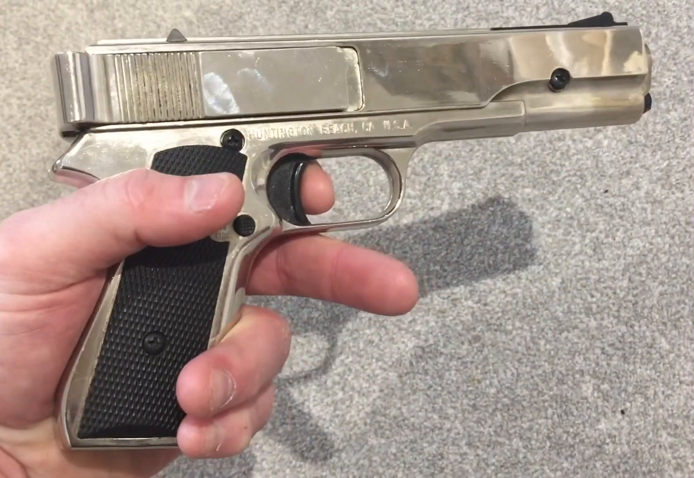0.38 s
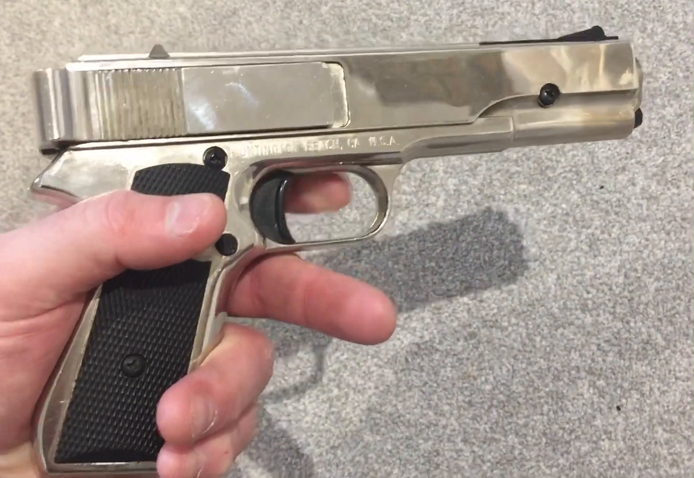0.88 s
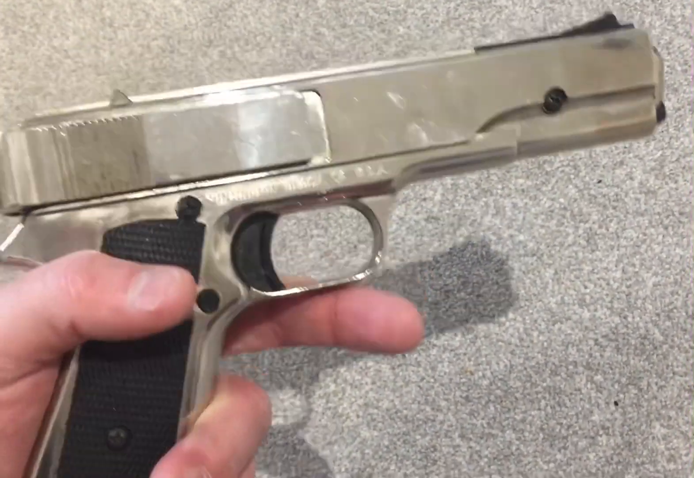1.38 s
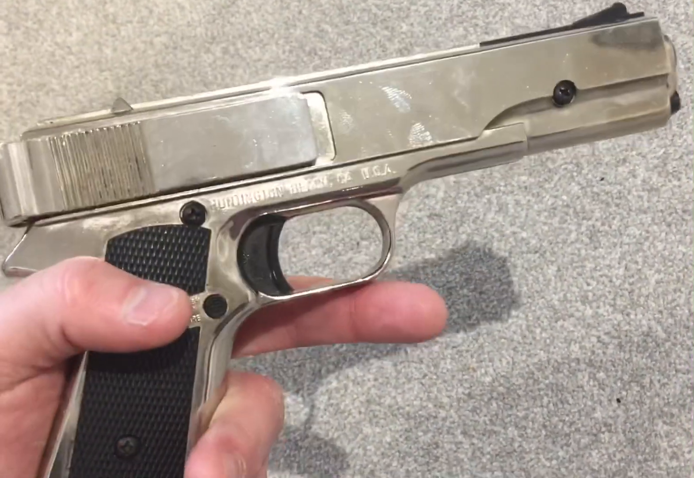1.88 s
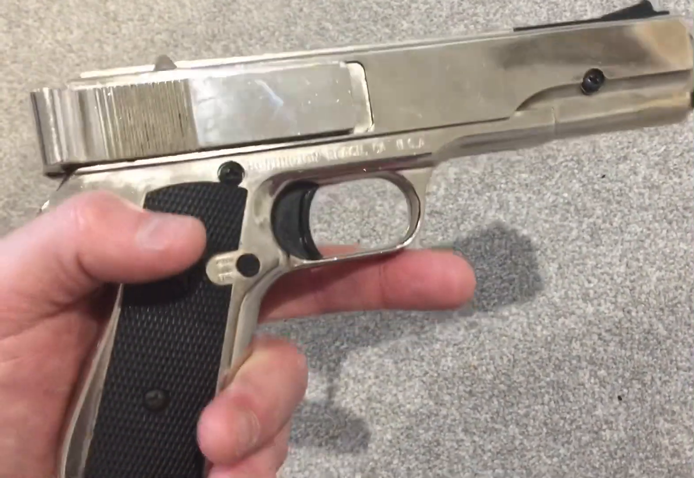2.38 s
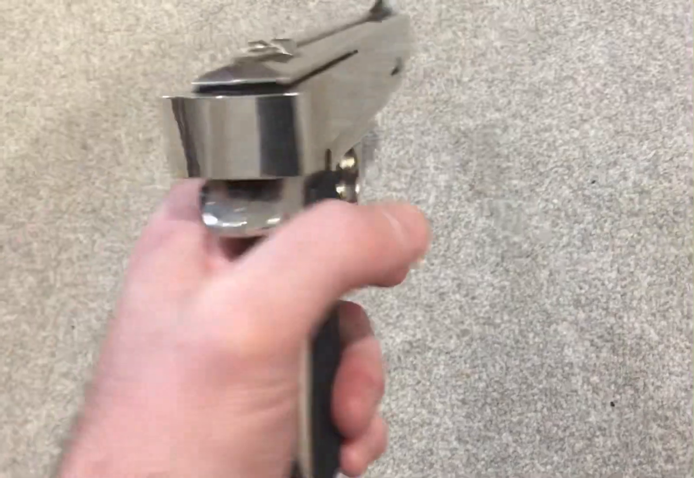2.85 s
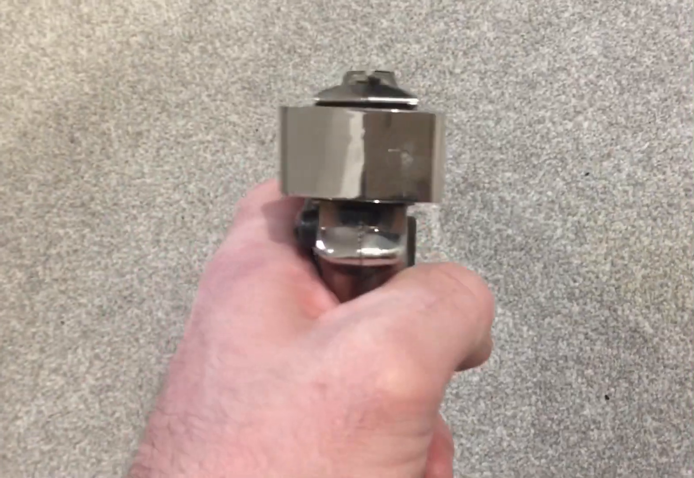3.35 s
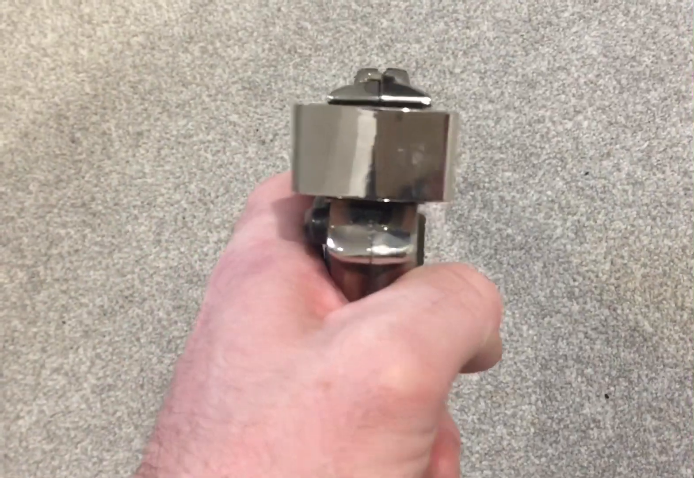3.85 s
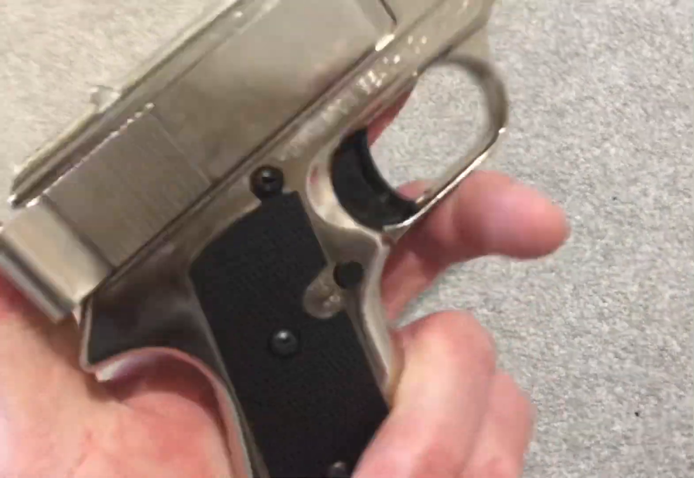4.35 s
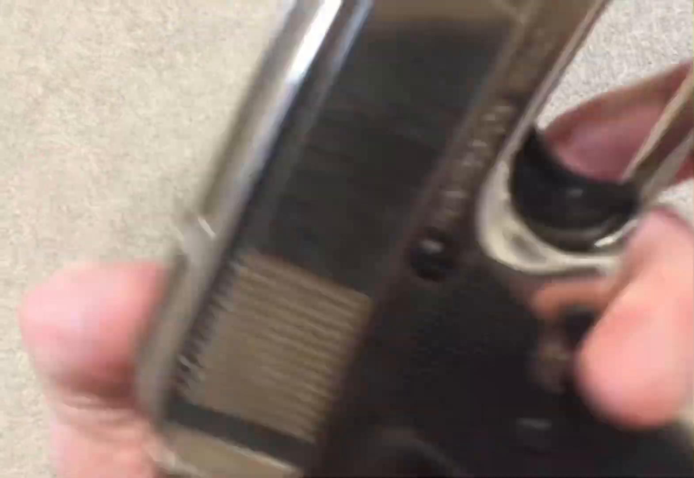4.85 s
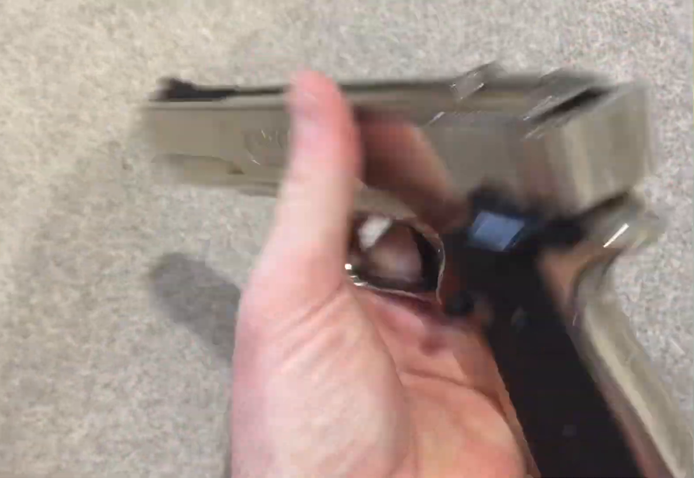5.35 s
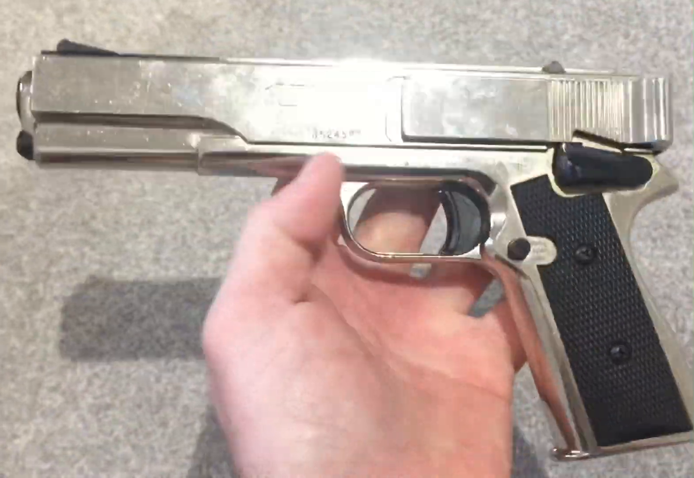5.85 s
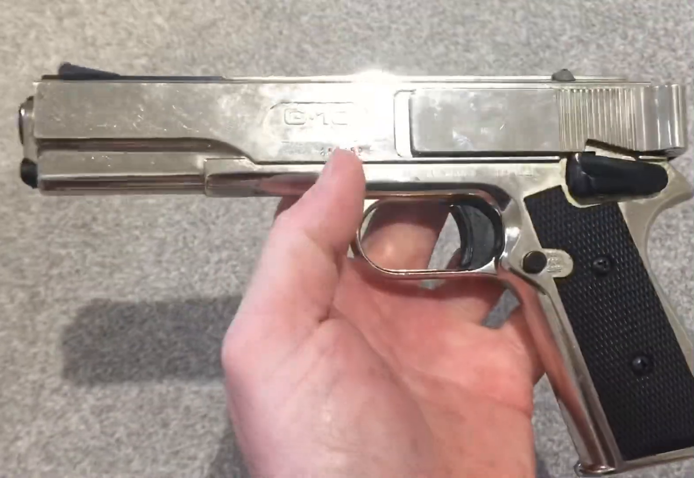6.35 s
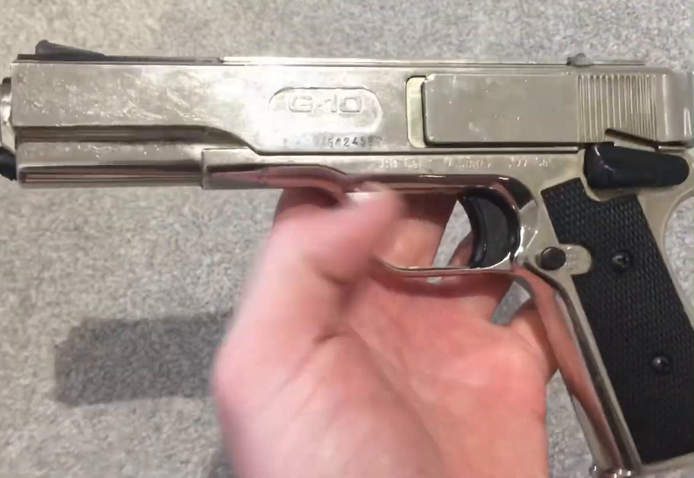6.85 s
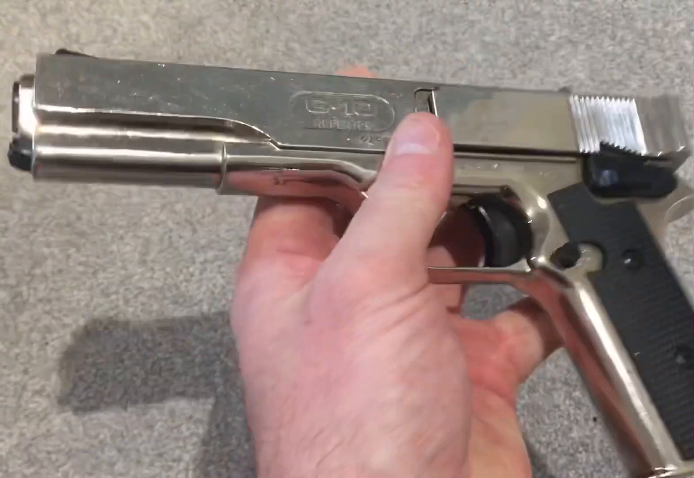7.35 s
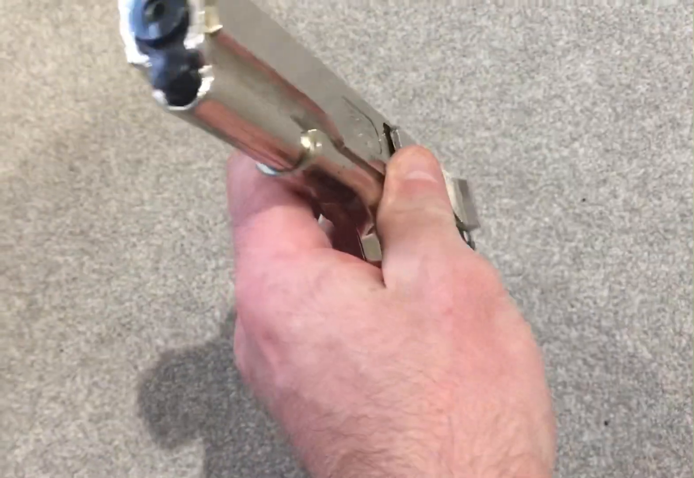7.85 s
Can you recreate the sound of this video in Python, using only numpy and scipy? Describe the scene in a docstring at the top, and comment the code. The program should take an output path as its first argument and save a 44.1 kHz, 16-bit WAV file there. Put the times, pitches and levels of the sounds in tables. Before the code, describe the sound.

Mostly quiet room hiss, then a busy cluster of sharp, dry metallic clacks and rattling as a metal air pistol changes hands.

```python
"""A quiet carpeted room, where a metal air pistol is turned over in the hands close to a phone.
Loose parts knock inside the casting: bursts of micro-contacts excite its damped modes.
Sliding fingers and parts, and rattling tails after knocks, are dense slips in the same modes plus hiss.
Soft low bumps of the hand on the phone, faint reflections, air hiss, booming bands and thin
wavering tones complete the scene."""
import sys
import numpy as np
from scipy import signal
from scipy.fft import rfft, irfft
from scipy.io import wavfile
from scipy.ndimage import uniform_filter1d

SR = 44100
rng = np.random.default_rng(int(sys.argv[2]) if len(sys.argv) > 2 else 0)


def generate_wav(sig):
    """Save sig (samples, or channels by samples) to the path in sys.argv[1] as 16-bit PCM at SR."""
    pcm = np.round(np.clip(np.atleast_2d(sig).T, -1, 1) * 32767).astype(np.int16)
    wavfile.write(sys.argv[1], SR, pcm)


def to_linear_factor(level_db):
    """Convert decibel levels (scalar or array-like) to linear amplitude factors."""
    exponent = np.asarray(level_db, float) / 20
    return 10 ** exponent


N = 351477  # length in samples

# Modes of the hand-held casting.
# Each row: frequency in Hz, relative level in dB, 60 dB decay time in seconds.
MODES = [(700, -10, 0.023), (900, -9, .02), (1110, -4, 0.021), (1480, -20.5, .014), (1764, 1.5, 0.012),
         (1932, -5, 0.026), (2310, -1.5, .016), (2606, 2.5, 0.007), (2950, 1, 0.0069), (3300, -2, .01),
         (3560, -8, .01), (4052, 6.5, 0.0051), (4475, -2, 0.0076), (4728, 3, 0.0053), (5200, -7.5, .012),
         (5763, -5, 0.013), (6300, -7, .01), (7000, -2, 0.0031), (7700, -0.5, 0.003), (8627, -8, 0.0052),
         (8900, -8.5, 0.011), (9000, -36, .08), (9550, -9.5, 0.0064), (10340, -12.5, .008),
         (11260, -11, .014), (11400, -37, .07), (12460, -13, .007), (13400, -13.5, .012),
         (14380, -22, .007), (15300, -25, .008)]


def evened(x):
    """Normalisation of power: scales a signal to rms 1."""
    return x / np.sqrt(np.mean(x ** 2) + 1e-20)


def read(points, hz):
    """Interpolation of a (Hz, value) table on a logarithmic frequency axis."""
    f, value = np.transpose(points)
    return np.interp(np.log(hz + 1), np.log(f + 1), value)


def add(mix, s, sound):
    """Superposition: sums a sound into the mix from s seconds on."""
    part = mix[round(s * SR):][:len(sound)]
    part += sound[:len(part)]


def coloured(x, gain_at):
    """Linear filtering: multiplies the spectrum by a gain that is a function of Hz."""
    return irfft(rfft(x) * gain_at(np.fft.rfftfreq(len(x), 1 / SR)), len(x))


def ringing(weights):
    """Modal superposition: each row is a damped sine, scaled and signed by how its mode is struck."""
    hz, db, t60 = np.transpose(MODES)[:, :, None]
    t = np.arange(3500) / SR
    onset = 1 - np.exp(-t * hz / 0.13)  # a contact lasts a fraction of a cycle
    decay = to_linear_factor(db - 60 * t / t60)
    return weights[:, None] * onset * decay * np.sin(2 * np.pi * hz * t)


def knocks():
    """Impact excitation: each knock is a swell and decay of micro-contacts that ring the casting."""
    # Knocks of loose parts. Each row: start in seconds, strength in dB, frequency in Hz that the
    # struck spot favours, hardness in dB, how freely the heavy frame rings in dB.
    events = [(0.5524, -60, 1970, -20, -12), (0.561, -38.5, 1880, -8, -3.5), (0.5635, -37, 2100, 1, -38),
              (0.5727, -49, 1740, 5, -1), (0.5777, -31, 3700, 1.5, -33), (0.8702, -47.5, 710, -16, -5),
              (0.909, -65, 2100, -14, -11), (1.062, -62, 1980, -18, -5), (1.0927, -42, 1120, -7, -3.5),
              (1.1015, -42.5, 1960, -28, -8), (2.5837, -44, 3300, -9, -18), (2.721, -60, 1080, -3, 18),
              (3.1602, -47.5, 3170, -1.5, -44), (4.2373, -46.5, 2586, -6, -6), (4.3151, -27.5, 690, 10, 4),
              (4.3194, -31.5, 4100, 2, -7.5), (4.3524, -49, 736, 5, 8), (4.4805, -23, 2520, 1, -17.5),
              (4.4896, -23, 8700, 7, -1), (4.5009, -27.5, 9020, -4, -2.5), (4.5079, -33.5, 8600, 4, -2),
              (4.6476, -16.5, 4070, 12, -2), (4.6545, -23, 8900, 3.5, -27), (4.6831, -28.5, 2426, 3, -12.5),
              (4.8824, -27.5, 1800, 6.5, -4.5), (4.908, -38, 1824, -6, -16),
              (4.9302, -27.5, 2454, -3, -25.5), (4.9496, -26, 8750, 3, -6), (4.9607, -33.5, 8646, 4, 5.5),
              (4.9676, -36, 3975, 4.5, -5), (5.0017, -30.5, 1074, -6, 2), (5.0068, -18, 4067, -4, -18.5),
              (5.0171, -33.5, 1850, 0, -5), (5.026, -39, 1883, -0.5, -7), (5.0695, -20.5, 1124, 10, 4),
              (5.0781, -12.5, 4570, 5, -19.5), (5.0816, -18, 2380, -2, -28), (5.1065, -39.5, 679, 0, 1),
              (5.2219, -53.5, 2290, -3, -34), (5.2471, -52, 2260, 4.5, -9), (5.2641, -19.5, 4410, 7, -32),
              (5.2695, -23.5, 8830, -0.5, -16.5), (5.3245, -43, 1730, 6.5, 3),
              (5.3407, -32, 3290, 1, -25.5), (5.4464, -52.5, 1100, 6, 5), (5.4644, -45.5, 780, -12, -3),
              (5.4713, -26, 8560, -1, -20), (5.5117, -37.5, 3680, -1, -7), (5.5749, -45, 1030, 7, 4),
              (5.6951, -34.5, 1100, 4, 2), (5.7122, -29.5, 5200, -1.5, -16),
              (5.7965, -49.5, 1750, -13, -27), (6.9492, -64, 2580, 0, -6), (7.1344, -43.5, 2600, 1, -14),
              (7.1423, -48.5, 1880, -14, -14), (7.1551, -47.5, 814, 3.5, 2), (7.1773, -25, 5040, 9, 0.5),
              (7.192, -47, 9000, -6, 4), (7.5277, -62, 2810, -3.5, -16), (7.5825, -54, 3300, -11, -7.5),
              (7.7156, -49, 1100, 3, 5.5), (7.7245, -57, 3100, -3.5, 2)]
    # Borders between the frequency regions of the casting, in Hz.
    borders_hz = [1400, 3200, 6500]
    # Level that each region, low to high, gains with hardness, in dB per dB.
    hardness_slope = [0.016, 0.13, .8, 1.57]
    # Relative level of each region, low to high, in a knock of hardness 0 dB, in dB.
    middling_db = [-0.54, -0.2, .6, -6.5]
    chatter_s, grip_slope = 0.0015, 0.077  # decay time at frame_db 0; its change in dB per dB of frame_db
    spot_region_db = 2  # extra for the region that holds the favoured frequency
    firm_db, weak_dull = -29.5, 0.3  # top region loses weak_dull dB per dB of strength below firm_db

    out, t = np.zeros(N), np.arange(600) / SR
    mode_hz = np.transpose(MODES)[0]
    region = np.searchsorted(borders_hz, mode_hz)
    for s, db, favoured_hz, hard_db, frame_db in events:
        contacts = rng.standard_normal(600) * (rng.random(600) < 0.3)
        decay_s = chatter_s * to_linear_factor(grip_slope * frame_db)  # a grip that damps the frame shortens the chatter
        contacts *= (1 - np.exp(-t / 0.0002)) * np.exp(-(t / decay_s) ** 0.81)

        away = abs(np.log(mode_hz / favoured_hz))  # modes far from the favoured one are struck less
        spot_db = 8.9 * np.exp(-(away / 0.12) ** 2) - 3.3 * away
        spot_db += 0.5 * rng.standard_normal(len(MODES))
        modes = ringing(rng.choice([-1, 1], len(MODES)) * to_linear_factor(spot_db))
        rings = signal.fftconvolve(contacts[None], modes, axes=1)
        # the spot, not the timing of the chatter, sets the energy that each mode takes up
        rings *= (np.linalg.norm(modes, axis=1) / np.linalg.norm(rings, axis=1))[:, None]

        share = to_linear_factor(middling_db + hard_db * np.array(hardness_slope))  # hard contacts reach the high modes
        share[0] *= to_linear_factor(frame_db)
        share[-1] *= to_linear_factor(weak_dull * min(db - firm_db, 0))  # weak contacts are dull
        share[np.searchsorted(borders_hz, favoured_hz)] *= to_linear_factor(spot_region_db)
        share /= np.linalg.norm(share)
        for k, part in enumerate(share):
            ring = rings[region == k].sum(0)
            burst_rms = np.sqrt(np.sum(ring ** 2) / 220)  # as if the energy filled 5 ms
            add(out, s, to_linear_factor(db) * part * ring / burst_rms)
    # a small object radiates almost no bass
    return signal.sosfilt(signal.butter(4, 500, "high", fs=SR, output="sos"), out)


def slides():
    """Friction and rattle: dense uneven slips rasp through the modes, with bright hiss added."""
    # Strokes of skin and parts over the metal, and rattling tails that die away after knocks.
    # Each row: start in seconds, length in seconds, level at the start in dB,
    # change of level over the length in dB, hiss relative to the rasp in dB.
    passages = [(0.531, .2, -54, -35.5, -12.5), (.78, .15, -80, 6, -20), (1.055, .14, -70, -9, -9),
                (4.278, .09, -69, 11, -8.5), (4.36, 0.032, -58, 2.5, 0.5), (4.402, .095, -73, 13, -21),
                (4.5, .08, -57.5, -14.5, -15.5), (4.655, 0.093, -54.5, -14, -12.5),
                (4.809, 0.12, -51, 9.5, -22.5), (4.927, .125, -56, -5.5, -15.5),
                (5.119, 0.24, -66, 1.5, -12), (5.22, 0.028, -69.5, -0.5, 5.5),
                (5.25, .17, -59.5, -7.5, -14), (5.442, .11, -56.5, -1.5, -15), (5.55, .15, -70.5, -3, -13),
                (5.69, .16, -66, -10, -13), (5.95, .7, -73.5, -3, -20)]
    # Colour of the rasp. Each row: frequency in Hz, gain in dB.
    colour = [(400, -25.5), (850, 3), (1300, -4), (1800, -0.5), (2500, -2.5), (3400, 1.5), (3900, -1),
              (4500, -10.5), (7000, -8.5), (15000, -27.5)]
    judder_db, judder_s = 1.5, 0.0054  # rms waver of contact pressure; its smoothing time
    edges = 0.43  # share of a passage spent fading in and out

    slip_db = 3.0 * np.minimum(rng.exponential(1, N), 4)
    slips = rng.standard_normal(N) * to_linear_factor(slip_db) * (rng.random(N) < 4000 / SR)  # 4000 a second
    alternating = (-1.) ** np.arange(len(MODES))
    rung = signal.oaconvolve(slips, ringing(alternating).sum(0))[:N]
    rasp = evened(rung) + 0.3 * evened(slips)
    rasp = evened(coloured(rasp, lambda hz: to_linear_factor(read(colour, hz))))
    hiss = evened(np.diff(rng.standard_normal(N + 1)))
    waver = evened(uniform_filter1d(rng.standard_normal(N), round(judder_s * SR)))
    rasp = evened(rasp * to_linear_factor(judder_db * waver))

    out = np.zeros(N)
    for s, length, db, fade_db, hiss_db in passages:
        u = np.arange(0, 1, 1 / (length * SR))  # progress through the passage
        at = slice(round(s * SR), round(s * SR) + len(u))
        rub = rasp[at] + to_linear_factor(hiss_db) * hiss[at]
        add(out, s, to_linear_factor(db + fade_db * u) * signal.windows.tukey(len(u), edges) * rub)
    return out


def bumps():
    """Damped oscillation: the hand bumps the phone in a few low cycles with a soft start."""
    # Soft bumps. Each row: start in seconds, peak of the envelope in dB, frequency in Hz.
    events = [(4.278, -49.5, 71), (4.35, -53, 65), (4.491, -60, 180), (4.712, -55, 108), (4.841, -50, 68.6),
              (5.07, -58, 151.4), (5.219, -54, 326), (5.959, -52.5, 75)]
    out, t = np.zeros(N), np.arange(4000) / SR
    for s, db, hz in events:
        u = t / 0.0074  # the envelope peaks at 7.4 ms
        add(out, s, to_linear_factor(db) * u * np.exp(1 - u) * np.sin(2 * np.pi * hz * t))
    return out


def room(x):
    """Reverberation: reflections of random sign, after the path to the floor and back, die away."""
    # Decay of the room. Each row: frequency in Hz, 60 dB decay time in seconds.
    decay = [(500, .16), (1500, 0.11), (4000, 0.078), (12000, 0.07)]
    taps, at = np.zeros(SR // 3), np.arange(380, SR // 3 - 10, 10)  # one in every ten samples
    taps[at + rng.integers(0, 10, len(at))] = rng.choice([-1., 1.], len(at))
    hz, t, z = signal.stft(taps, SR, nperseg=128)
    fading = to_linear_factor(-60 * t / read(decay, hz)[:, None])
    tail = signal.istft(z * fading, SR, nperseg=128)[1]
    return signal.oaconvolve(x, tail / np.linalg.norm(tail))[:N]


def background():
    """Stationary noise: broad air and microphone hiss, booming bands and thin wavering tones."""
    # Spectrum of the hiss. Each row: frequency in Hz, relative level in dB.
    hiss_colour = [(15, -46), (25, -18.5), (53, -6.5), (108, -1), (130, -9.5), (256, -11.5), (354, -8.5),
                   (516, -12.5), (560, -16.5), (607, -16), (1040, -15.5), (2050, -20), (2410, -21.5),
                   (11900, -33), (16000, -38)]
    # Booming room bands. Each row: centre in Hz, 1/e half-width in Hz, rms level in dB.
    booms = [(60, 15, -76), (105, 24, -71), (367, 50, -77), (1166, 80, -81), (180, 40, -83)]
    # Tones of a distant appliance. Each row: frequency in Hz, rms level in dB.
    tones = [(301.5, -77.5), (602.9, -77), (678.3, -82.5), (1357, -88), (1669, -88), (2110, -84.5)]
    hiss = coloured(rng.standard_normal(N), lambda hz: to_linear_factor(read(hiss_colour, hz)))
    out = to_linear_factor(-65.5) * evened(hiss)
    for centre_hz, width, db in booms:
        band = coloured(rng.standard_normal(N), lambda hz: np.exp(-((hz - centre_hz) / width) ** 2))
        out = out + to_linear_factor(db) * evened(band)
    for hz, db in tones:
        drift = np.cumsum(rng.standard_normal(N)) * 0.027  # random walk of phase in radians
        out = out + to_linear_factor(db) * np.sqrt(2) * np.sin(2 * np.pi * hz * np.arange(N) / SR + drift)
    return out


def scene():
    """Direct and reverberant sound: the pistol close, a little room behind it, bumps and background."""
    pistol = knocks() + slides()
    return (pistol + to_linear_factor(-18.5) * room(pistol) + bumps() + background())[None]


def low_pass(x):
    """Removes everything above the highest recorded frequency."""
    return signal.sosfilt(signal.butter(12, 16860, fs=SR, output="sos"), x)


def record(dry):
    """Linear filtering by the phone's sound port, which weakens two bands of the treble."""
    # Notches of the port. Each row: centre in Hz, 1/e half-width in Hz, gain in dB.
    notches = [(7540, 580, -2), (10450, 500, -2.5)]

    def port_gain(hz):
        """Product of resonance curves: the notches add in dB."""
        return to_linear_factor(sum(db * np.exp(-((hz - f) / w) ** 2) for f, w, db in notches))

    heard = coloured(dry[0], port_gain)
    return low_pass(heard[None])


dry = scene()
out = record(dry)
generate_wav(out)
```